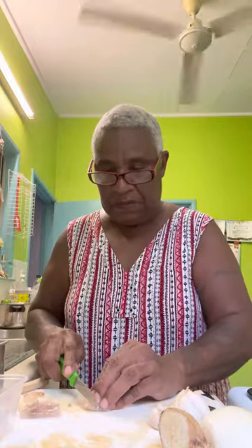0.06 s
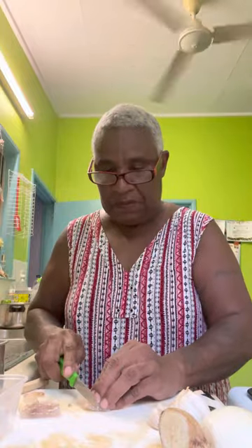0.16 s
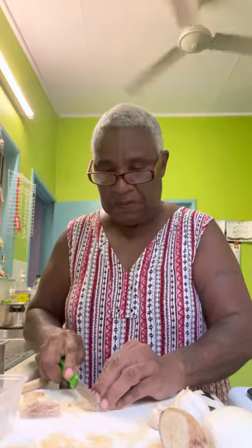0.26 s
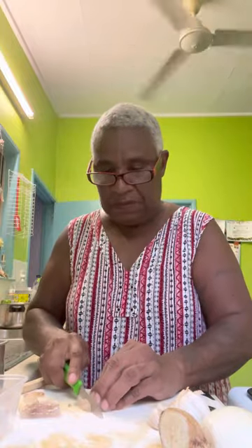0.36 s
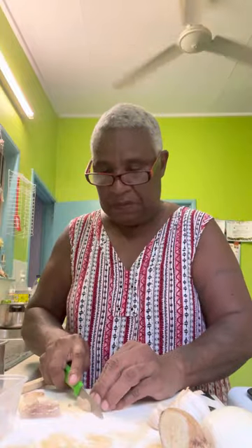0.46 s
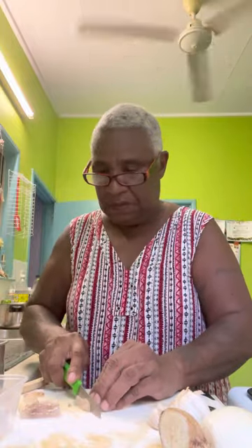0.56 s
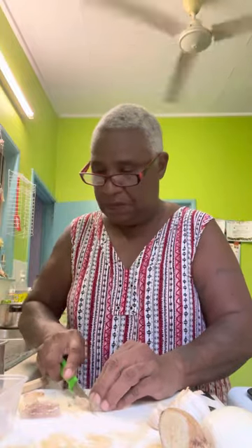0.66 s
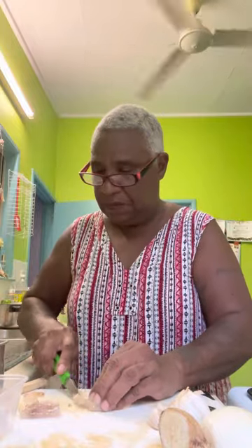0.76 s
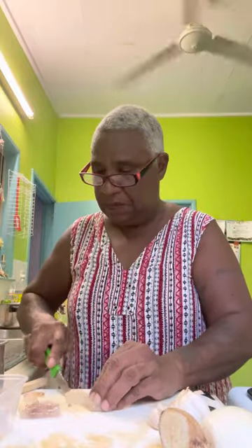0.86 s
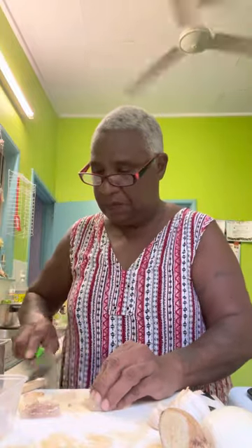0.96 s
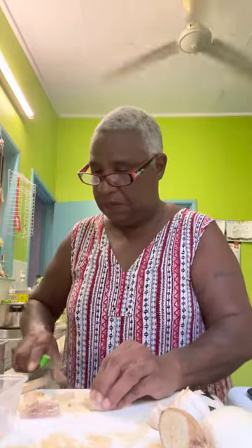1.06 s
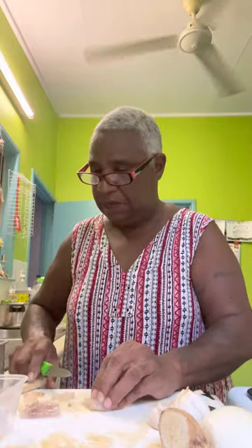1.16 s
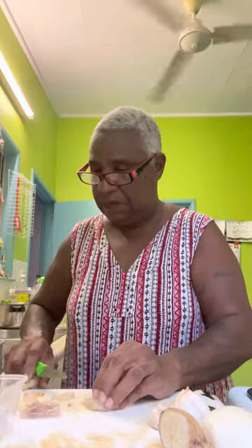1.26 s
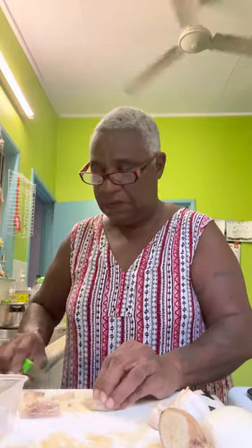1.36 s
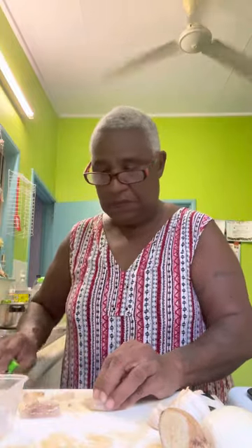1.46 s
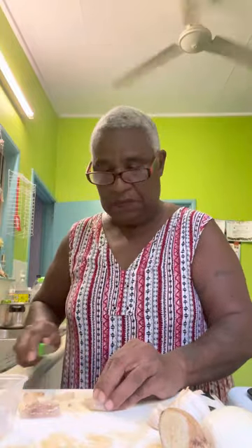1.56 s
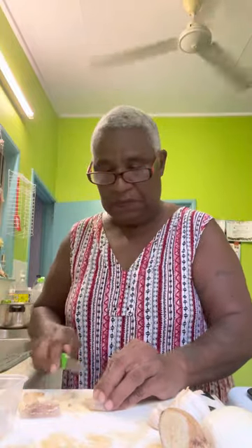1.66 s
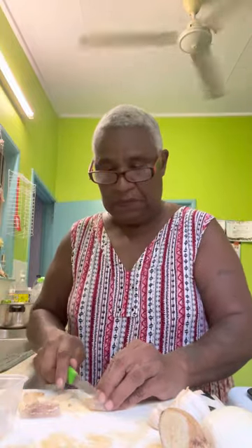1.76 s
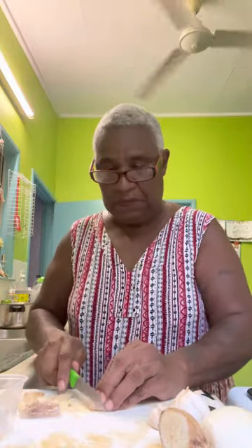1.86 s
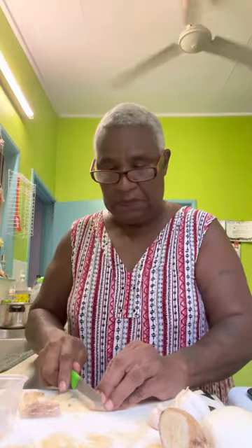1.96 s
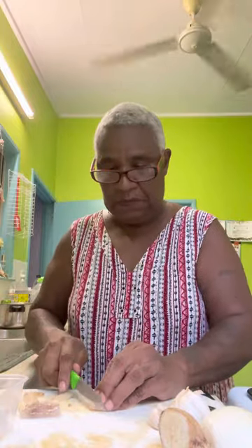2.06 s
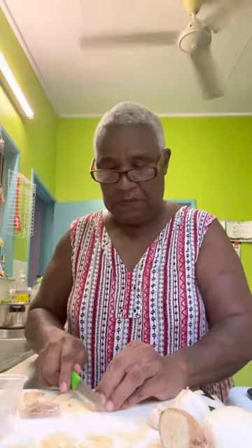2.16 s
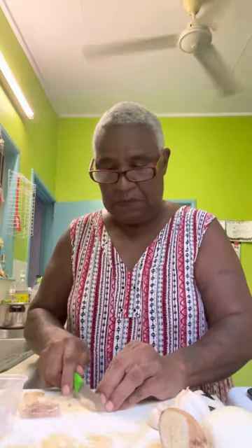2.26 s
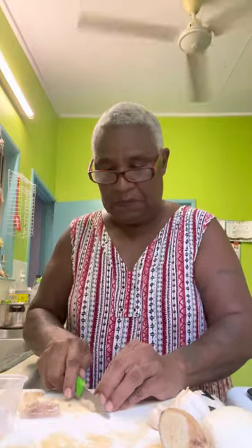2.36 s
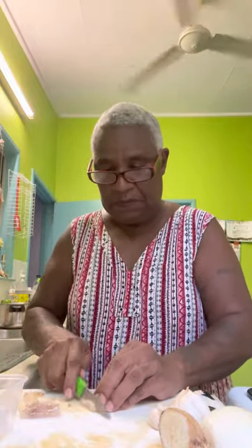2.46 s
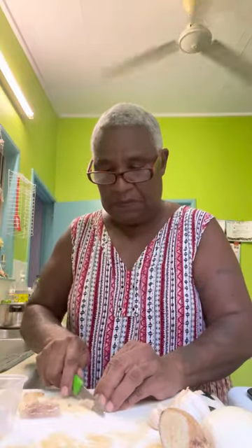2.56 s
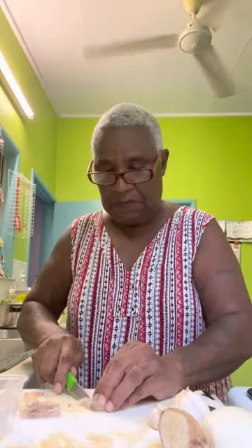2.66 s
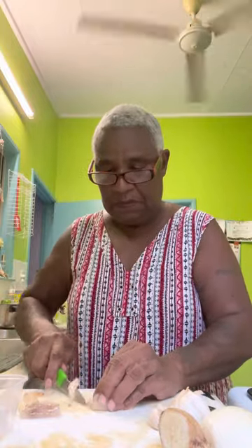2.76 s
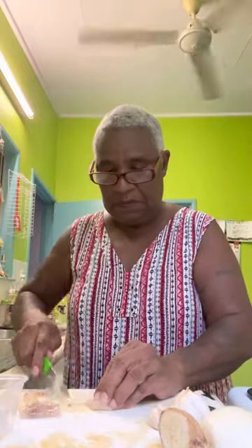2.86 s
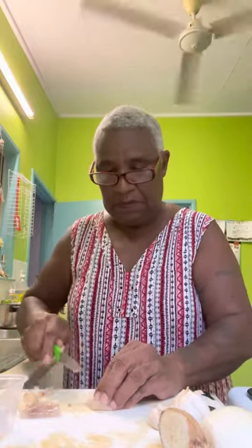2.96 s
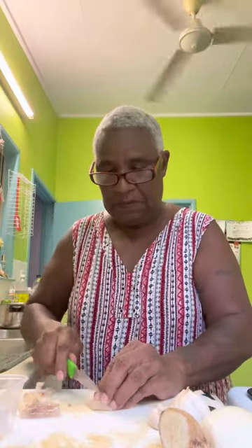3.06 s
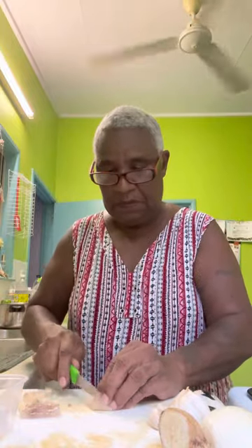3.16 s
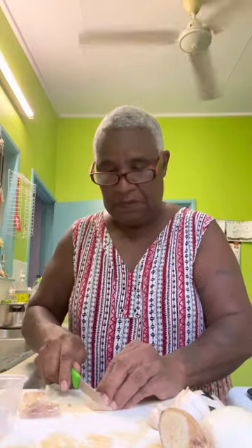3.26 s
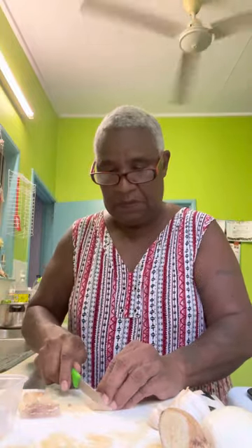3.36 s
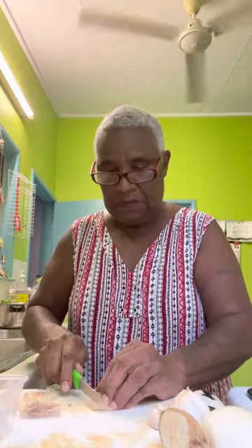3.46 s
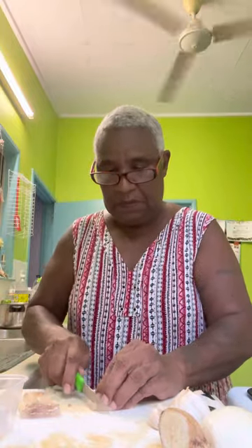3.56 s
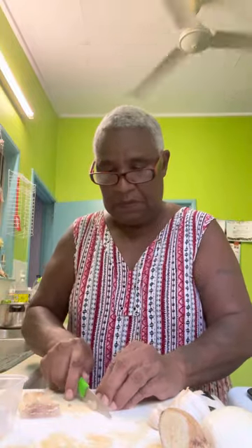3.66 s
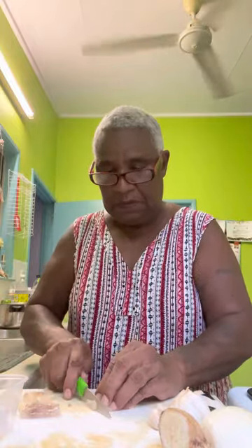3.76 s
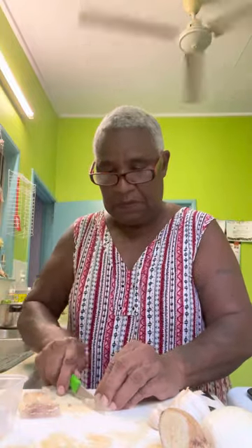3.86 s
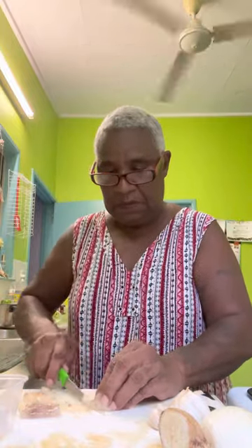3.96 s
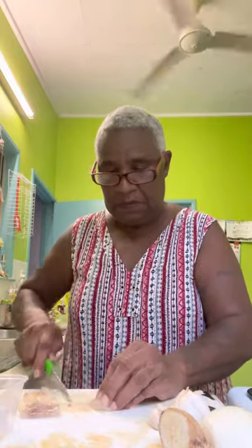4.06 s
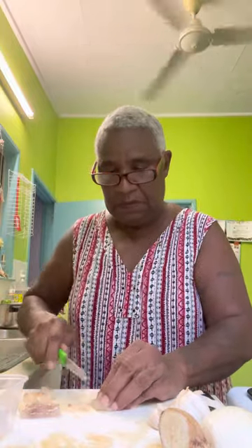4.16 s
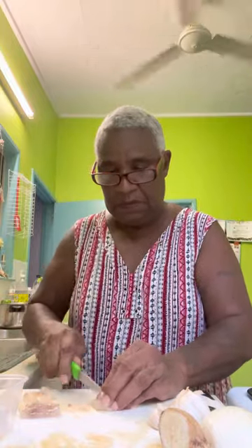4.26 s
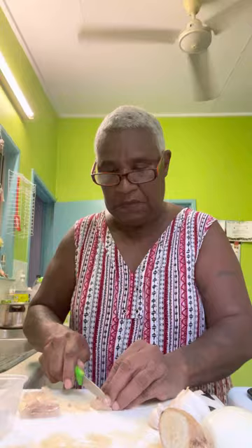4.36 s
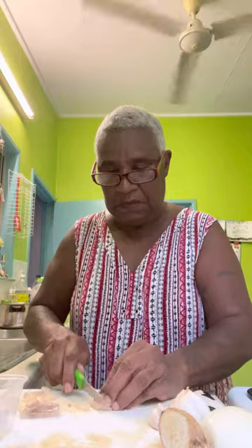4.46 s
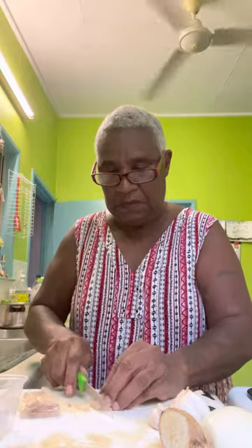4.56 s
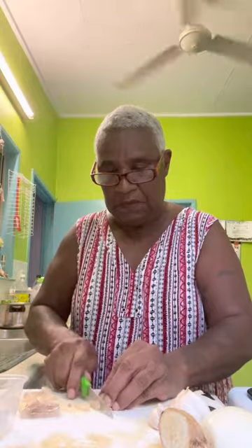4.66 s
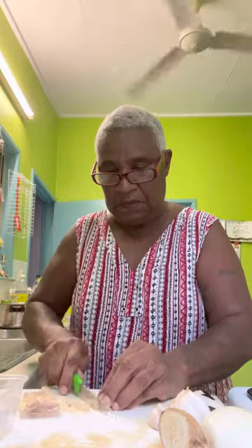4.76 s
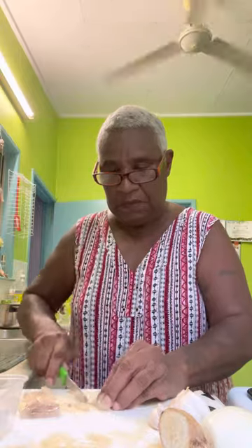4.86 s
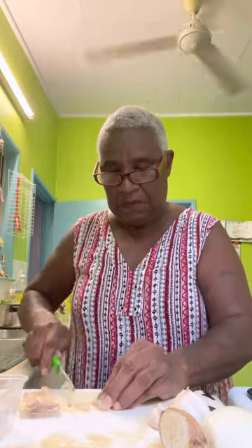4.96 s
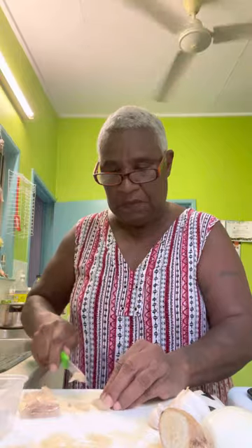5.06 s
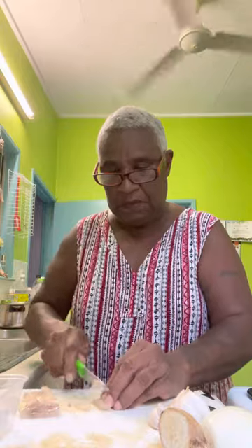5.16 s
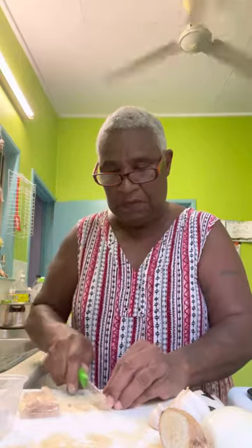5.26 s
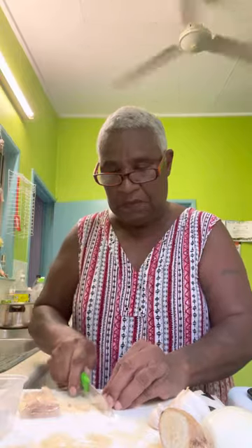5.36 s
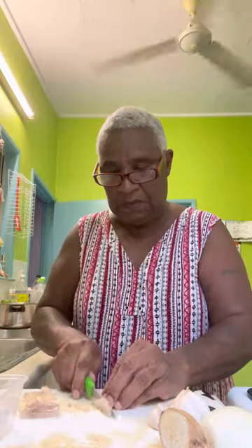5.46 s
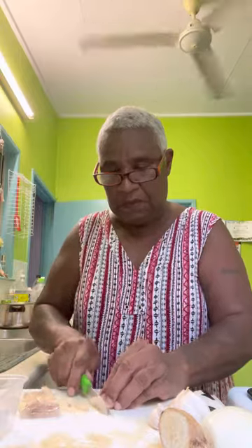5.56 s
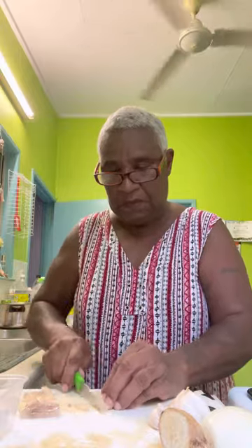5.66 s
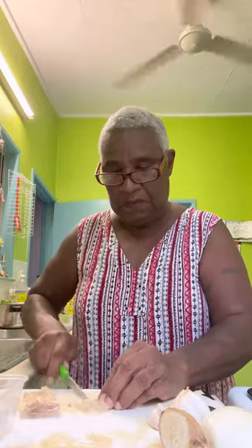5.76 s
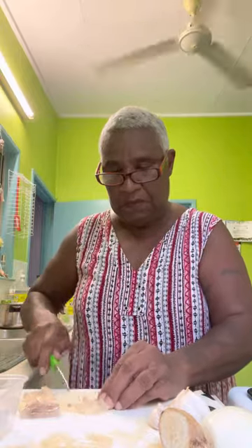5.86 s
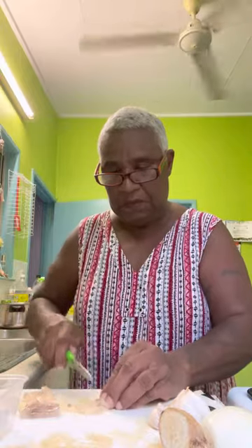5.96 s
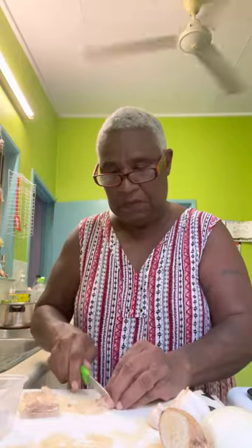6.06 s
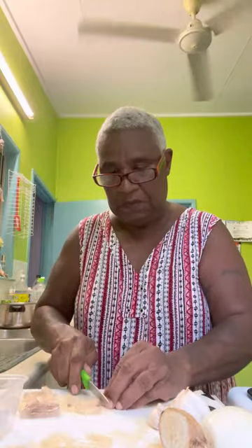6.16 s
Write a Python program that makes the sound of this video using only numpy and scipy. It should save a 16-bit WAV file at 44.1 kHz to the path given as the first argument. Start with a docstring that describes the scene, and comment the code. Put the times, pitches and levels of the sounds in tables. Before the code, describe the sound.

Over soft fan hum in a small kitchen, a blade scrapes through firm food five times; a plastic-like tub judders and knocks after the first.

```python
"""A ceiling fan hums and stirs the air of a small kitchen; then a knife rings faintly and makes five slices.
The blade touches down lightly, rasps through firm food as its fibres tear, and taps the cutting board.
After the first slice a tub is nudged along the counter: it judders and knocks hollowly.
Noise grains make the friction, pulses into resonances the knocks; a phone close by picks it up in stereo."""
import sys
import numpy as np
from scipy import signal
from scipy.fft import rfft, irfft, next_fast_len
from scipy.io import wavfile
from scipy.ndimage import map_coordinates

SR = 44100
rng = np.random.default_rng(int(sys.argv[2]) if len(sys.argv) > 2 else 0)


def transcribe(u):
    """Save the signal u as a 16-bit wav file named by the first command-line argument.

    u: samples, shape (n,) or (channels, n), limited to [-1, 1]; the rate is SR.
    q: integer samples, one column per channel.
    """
    v = np.clip(np.atleast_2d(u).T, -1, 1)
    q = np.round(v * 32767).astype(np.int16)
    wavfile.write(sys.argv[1], SR, q)


N = 274281

# spectrum of blade and board shaken under a stroke: hz, relative_db
RASP_SPECTRUM = [(30, -46), (140, -24.5), (330, -18), (650, -21.5), (900, -29.5), (1150, -20), (1600, -25),
                 (1950, -17.5), (2160, 2), (2330, -3.5), (2550, -31), (2800, -15.5), (3700, -26),
                 (7000, -58)]
# spectrum of the free blade's higher ring, early in a stroke: hz, relative_db
EDGE_SPECTRUM = [(1200, -53), (2100, -15), (2320, -8.5), (2480, -9), (2620, -12.5), (2800, -22),
                 (3500, -36.5), (6000, -58)]
# spectrum of the tearing fibres: hz, relative_db
TEAR_SPECTRUM = [(1500, -47), (2800, -11.5), (3200, -5), (3700, -21.5), (4200, 1.5), (5000, 3), (5450, -6),
                 (5850, -12), (6500, -1), (7300, -2), (8500, -8), (10000, -16), (11500, -26.5),
                 (14000, -61)]

LIFT_S = 0.0074  # time constant of the friction's fade outside a push
LEFT_RIGHT = np.array([[1], [-1]])


def amp(db):
    """Decibels to gain."""
    return 10 ** (np.asarray(db) / 20)


def unit(x):
    """Scale to rms 1."""
    return x / np.sqrt(np.mean(x ** 2) + 1e-20)


def along(points, hz):
    """Read (hz, value) points on a logarithmic frequency axis."""
    point_hz, value = np.transpose(points)
    return np.interp(np.log(hz + 1), np.log(point_hz + 1), value)


def wobble(rate):
    """A smooth random curve with rate knots a second."""
    knots = rng.standard_normal(N // 20)
    return map_coordinates(knots, [np.arange(N) * rate / SR], mode="wrap")


def filtered(x, response):
    """Multiply the spectrum of x by a response of frequency."""
    size = next_fast_len(N + SR // 2)
    hz = np.fft.rfftfreq(size, 1 / SR)
    return irfft(rfft(x, size) * response(hz), size)[..., :N]


def through(x, response):
    """Convolve x with an impulse response of one or two channels."""
    return signal.fftconvolve(np.atleast_2d(x), np.atleast_2d(response), axes=1)[:, :N]


def colour(points, size=4096):
    """The causal impulse response of a spectrum, by way of its cepstrum, scaled to peak 1."""
    gain = amp(along(points, np.fft.rfftfreq(size, 1 / SR)))
    cepstrum = irfft(np.log(gain))
    h = irfft(np.exp(rfft(2 * cepstrum[:size // 2], size)))
    return h / np.abs(h).max()


def ringing(modes):
    """The impulse response of a few damped resonances, scaled to peak 1."""
    t = np.arange(SR // 10) / SR
    h = 0
    for k, (hz, width_hz, db) in enumerate(modes):
        decay = np.exp(-np.pi * width_hz * t)
        # neighbouring modes start with opposite signs
        h = h + (-1) ** k * amp(db) * width_hz * decay * np.sin(2 * np.pi * hz * t)
    h = h * (1 - np.exp(-t / 0.00018))  # the contact takes a moment
    return h / np.abs(h).max()


def blows(times, levels_db, grit=0., life_s=.004, push=0.97):
    """Each contact is a one-sample push and, where grit is set, a brief noisy crunch."""
    out = np.zeros(N + SR)
    t = np.arange(SR // 20) / SR
    envelope = np.exp(-t / life_s) * (1 - np.exp(-t / 0.00021))
    for contact_s, db in zip(times, levels_db):
        crunch = grit * rng.standard_normal(len(t)) * envelope
        out[round(contact_s * SR):][:len(t)] += amp(db) * (push * (t == 0) + crunch)
    return out[:N]


def grains(rate, spread_db):
    """Tiny fractures at random moments, rate a second, with random signs and sizes; rms 1."""
    moments = rng.random(N) < rate / SR
    signs = np.sign(rng.standard_normal(N))
    sizes = amp(spread_db * np.clip(rng.standard_normal(N), -2, 2))
    return unit(moments * signs * sizes)


def bent(x, lag):
    """Bending waves bring the bass after the treble: the delay is lag * (sqrt(1000 / hz) - 1/2), in s."""
    return filtered(x, lambda hz: np.exp(-2j * np.pi * lag * (2 * np.sqrt(1000 * hz) - hz / 2)))


def diffuse(pair):
    """Mix two unrelated signals into a diffuse field whose left-right likeness varies with frequency."""
    # correlation of the two microphones: hz, likeness (1 = identical)
    likeness = [(100, 1), (300, 0.96), (600, 1), (1200, 0.055), (2300, 0.71), (5000, 0.54)]

    def mid_side_gains(hz):
        turn = np.arccos(np.clip(along(likeness, hz), -1, 1)) / 2
        return np.array([np.cos(turn), np.sin(turn)])

    mid, side = filtered(pair, mid_side_gains)
    return np.array([mid + side, mid - side])


def echo(x, decay, count=14):
    """Reflections as decaying noise, different at each microphone, drawn anew for count equal stretches."""
    x = np.atleast_2d(x)
    out = np.zeros((2, N + SR))
    for part in np.array_split(np.arange(N), count):
        hz, t, z = signal.stft(rng.standard_normal((2, SR // 2)), SR, nperseg=256)
        t60 = along(decay, hz)[:, None]
        tail = signal.istft(z * np.exp(-np.log(1000) * t / t60), SR, nperseg=256)[1]
        wet = signal.fftconvolve(x[:, part], tail / np.linalg.norm(tail[0]), axes=1)
        out[:, part[0] + SR // 1000:][:, :wet.shape[1]] += wet  # 1 ms after the direct sound
    return out[:, :N]


def placed(x, near_db, room_db):
    """Direct sound, the counter's quick reflections and the kitchen's tail."""
    # reflections close by: hz, t60_s
    counter_decay = [(200, 0.047), (2000, 0.029), (10000, 0.069)]
    # the room: hz, t60_s
    kitchen_decay = [(150, 0.25), (800, 0.33), (3000, 0.47), (10000, 0.33)]
    near = amp(near_db) * echo(x, counter_decay)
    room = amp(room_db) * echo(x, kitchen_decay)
    return x + diffuse(near + room)


def gesture(start, rise, hold, release, entry_db, sag_db=0., ease_db=0., curve=0.9):
    """The gain of one push of the hand: it swells, sags while held, eases off and stops; times in s."""
    t = np.arange(N) / SR - start
    progress = lambda begin, length: np.clip((t - begin) / length, 0, 1)
    db = -entry_db * (1 - progress(0, rise)) ** curve
    db = db - sag_db * progress(rise, hold)
    db = db - ease_db * progress(rise + hold, release)
    outside_s = np.maximum(np.maximum(-t, t - rise - hold - release), 0)
    return amp(db) * np.exp(-outside_s / LIFT_S)


def air(spectrum, lean_db):
    """Steady stereo noise of rms 1; lean_db raises the left and lowers the right."""
    noise = filtered(rng.standard_normal((2, N)), lambda hz: amp(along(spectrum, hz)))
    return unit(diffuse(noise) * amp(lean_db * LEFT_RIGHT))


def fan():
    """The ceiling fan: sines of wavering level and phase, noise for the stirred air, and a faint hiss."""
    # motor hum, before wavering: hz, rms_db
    motor_hum = [(74.6, -52), (76.2, -84), (100, -59), (175, -66.5), (441, -64)]
    # stirred air: hz, relative_db
    draught_spectrum = [(20, -42), (36, -27), (48, 3), (65, -8.5), (100, -2), (135, -7), (200, -3.5),
                        (400, -3), (600, -7), (1000, -14), (1600, -21), (2600, -28), (5000, -58)]
    # quiet kitchen: hz, relative_db
    hiss_spectrum = [(1000, -12.5), (1800, -11.5), (2230, 3), (2600, -8.5), (3100, -8), (3700, -15.5),
                     (4400, -12), (5200, -13), (6600, -11), (8500, -23.5), (9700, -29), (11000, -70)]
    t = np.arange(N) / SR
    hum = 0
    for hz, db in motor_hum:
        level = np.sqrt(2) * amp(db + 2.2 * wobble(7))
        hum = hum + level * np.sin(2 * np.pi * hz * t + .5 * wobble(3))
    draught = amp(-44.5 + 0.16 * wobble(7)) * air(draught_spectrum, lean_db=-0.95)
    hiss = amp(-54.5) * air(hiss_spectrum, lean_db=0.5)
    return hum + draught + hiss


def tub():
    """The tub judders along the counter, knocks and rebounds; slide and knocks excite its hollow modes."""
    # the hollow body: hz, relative_db, t60_s, left_minus_right_db
    tub_modes = [(145, -15, 0.11, 0.5), (245, -26.5, 0.2, -7), (389, -12, 0.14, -10), (411, -7, 0.12, -10),
                 (476, -23, 0.11, -9), (568, -12.5, 0.15, -4), (741, -9, .52, -1), (812, 0, .21, 0),
                 (871, -11, .2, -2), (1032, -11, .22, 8), (1320, -24, 0.19, 7), (1274, -16, 0.1, 4),
                 (1440, -17, 0.16, -8), (1516, -6.5, 0.058, -3), (1630, -46, 0.054, -6),
                 (2143, -22, 0.31, 20), (2400, -20, 0.11, 12), (2740, -26, .12, 1)]
    # small bump as the slide starts, then knock and rebounds, drive levels:
    # contact_s, ring_db, thump_db, click_db
    tub_knocks = [(1.219, -43, -38, -56), (1.4098, -15, -4.5, -48), (1.4136, -24, -20, -52),
                  (1.4234, -29, -12, -44), (1.4651, -27, -36, -54), (1.4738, -42, -36, -17),
                  (1.4774, -18, -32, -38)]
    # dull part of a knock: hz, relative_db
    thump_spectrum = [(25, -59), (70, -23), (110, -4), (150, 2), (200, -3.5), (290, -11), (390, 0.5),
                      (600, -4.5), (850, 2.5), (1550, -4.5), (1900, -17), (2300, -9), (3000, -26.5),
                      (6000, -36.5), (13000, -49)]
    # sharp part of a knock: hz, relative_db
    click_spectrum = [(300, -79), (1500, -18.5), (3000, 6), (4300, 0), (6000, -10), (8000, -12),
                      (10000, -22), (12000, -28), (15000, -56)]
    # friction on the counter: hz, relative_db
    scuff_spectrum = [(100, -5), (250, -13), (580, 9.5), (830, -15), (1100, -6.5), (1800, -13.5),
                      (2150, -8.5), (2600, -11.5), (3700, -16.5), (5000, -23), (8000, -27), (11000, -34.5),
                      (14000, -74)]
    slide_start_s, slide_rise_s, slide_length_s = 1.216, .09, 0.177
    slide_db, slide_swell_db = -35.5, 6.5

    t = np.arange(SR) / SR
    body = 0
    for hz, db, t60, left_minus_right_db in tub_modes:
        gain = amp(db + left_minus_right_db * LEFT_RIGHT / 2)
        body = body + gain * np.exp(-np.log(1000) * t / t60) * np.sin(2 * np.pi * hz * t)
    body = body * (1 - np.exp(-t / 0.0004))  # a blunt contact starts the ring softly

    s, ring_db, thump_db, click_db = np.transpose(tub_knocks)
    ring = bent(through(blows(s, ring_db), body), lag=0.00203)
    dull_blows = blows(s, thump_db - 1.5, grit=0.17, life_s=0.0091, push=1.5)
    thump = bent(through(dull_blows, colour(thump_spectrum)), lag=0.002954)
    sharp_blows = blows(s, click_db - 4, grit=0.28, life_s=0.0025, push=0.16)
    click = through(sharp_blows, colour(click_spectrum))

    judder = grains(rate=1500, spread_db=4.5)
    scuff = amp(-0.5) * unit(through(judder, colour(scuff_spectrum)))
    hollow_scrape = amp(-2) * unit(through(judder, body))
    push = gesture(slide_start_s, slide_rise_s, slide_length_s - slide_rise_s, LIFT_S, slide_swell_db)
    slide = amp(slide_db) * push * (scuff + hollow_scrape)
    hollow = placed(ring, near_db=-22, room_db=-17)
    return hollow + placed(thump + click + slide, near_db=-2.5, room_db=-1.0)


def ting():
    """The blade gives one thin ring before the first cut: a single decaying sine."""
    # faint touch on the steel: contact_s, pitch_hz, drive_db, t60_s
    steel_touch = (0.313, 4150, -53, .16)
    s, hz, db, t60 = steel_touch
    t = np.arange(SR // 2) / SR
    ring = np.sin(2 * np.pi * hz * t) * np.exp(-np.log(1000) * t / t60)
    return through(blows([s], [db]), ring)


def taps(rows, gap_s, settle_db, count=3):
    """The edge clicks and chatters, gap_s apart; the board gains settle_db on the blade per rebound."""
    # resonances of the blade: hz, width_hz, relative_db
    blade_modes = [(1585, 380, -15.5), (2204, 330, -0.5), (2300, 320, -1.5)]
    # resonances of the board: hz, width_hz, relative_db
    board_modes = [(327, 223, 0.5), (440, 175, 3.5), (760, 113, -4.5), (998, 29, -1.5), (1285, 85, -5.5)]
    # edge against wood: hz, relative_db
    click_spectrum = [(300, -79), (1500, -18.5), (3000, 6), (4300, 0), (6000, -10), (8000, -12),
                      (10000, -22), (12000, -28), (15000, -56)]
    contacts = []
    for s, db, loss_db, thud_db, click_db in rows:
        for k in range(count):
            contacts.append((s + k * gap_s, db - k * loss_db, thud_db + k * settle_db, click_db))
    s, db, thud_db, click_db = np.transpose(contacts)
    blade = through(blows(s, db - 6.5), ringing(blade_modes))
    board = through(blows(s, db + thud_db + 1.0), ringing(board_modes))
    gritty_blows = blows(s, db + click_db + 2.5, grit=0.2, life_s=0.0019, push=0.1)
    click = through(gritty_blows, colour(click_spectrum))
    return bent(blade + board, lag=0.002063) + click


def snaps():
    """Now and then a tough bundle of fibres gives way at once and jolts the blade."""
    # fibres giving way, drive levels: contact_s, jolt_db, crispness_db (relative to the jolt)
    tough_fibres = [(0.5576, -10.5, -9), (0.647, -7.5, -9.5), (0.7449, -11.5, -14), (2.5529, -15.5, -3),
                    (2.611, -4, -13), (3.7537, -13.5, -6.5), (3.9094, -5.5, -14), (4.7289, -9.5, -10),
                    (5.5653, -17.5, 1.5), (5.5932, -6, -20), (5.646, -7, -24), (5.694, -9, -2)]
    s, db, crisp_db = np.transpose(tough_fibres)
    crackle = blows(s, db + crisp_db + 0.5, grit=0.34, life_s=0.0015, push=0.14)
    jolt = blows(s, db - 6.0)
    blade = through(jolt, colour(EDGE_SPECTRUM)) + amp(-12) * through(jolt, colour(RASP_SPECTRUM))
    return blade + through(crackle, colour(TEAR_SPECTRUM))


def strokes():
    """One gesture per slice: free ring and crispness fade sooner than the rasp against the board."""
    # slices: start_s, sinking_s, cutting_s, easing_s, bite (curve exponent, 1 = even swell),
    # pressure_db (on the blade, before unevenness), crispness_db (relative to the pressure)
    slices = [(0.48, 0.14, 0.15, 0.15, 2, -26.5, -12), (2.465, 0.16, 0.072, 0.14, 3.1, -23, -10),
              (3.729, 0.13, 0.054, 0.14, 3.6, -20, -7.5), (4.687, 0.13, 0.062, 0.052, 2.52, -19.5, -9),
              (5.525, 0.089, 0.1, 0.067, 2.7, -20.5, -7.5)]
    entry_db = 34.5  # how far below full pressure a stroke starts
    sag_db, base_ease_db = 2, 17  # pressure lost while cutting and while easing off
    rasp_grows_db = 1.5  # makes up most of the sag, so the rasp barely weakens while cutting
    grip_cut_db, grip_ease_db = 1, 29  # free ring lost on top as the food grips the blade
    dull_cut_db, dull_ease_db = 7.5, 12  # crispness lost on top as the blade goes deeper
    pressure = free_ring = crispness = 0
    for *timing, bite, db, crisp_db in slices:
        def fading(cut_db, ease_db):
            return amp(db) * gesture(*timing, entry_db, sag_db + cut_db, base_ease_db + ease_db, bite)

        pressure = pressure + fading(-rasp_grows_db, 0)
        free_ring = free_ring + fading(grip_cut_db, grip_ease_db)
        crispness = crispness + amp(crisp_db) * fading(dull_cut_db, dull_ease_db)
    return pressure, free_ring, crispness


def slicing():
    """Fibres tear in clumps under the edge: they hiss and shake blade and board, as filtered grains."""
    uneven = amp(0.9 * wobble(60))  # the food resists unevenly
    pressure, free_ring, crispness = np.array(strokes()) * uneven
    clumps = np.tanh(wobble(230))  # the edge sticks and slips
    fibres = grains(rate=2200, spread_db=4.5)
    rasp = unit(through(fibres * amp(0.87 * clumps), colour(RASP_SPECTRUM)))
    edge_grains = grains(rate=2200, spread_db=4.5)
    edge = unit(through(edge_grains * amp(0.43 * clumps), colour(EDGE_SPECTRUM)))
    fine_fibres = fibres + 0.4 * grains(rate=9000, spread_db=2)
    tear = unit(through(fine_fibres * amp(3.4 * clumps), colour(TEAR_SPECTRUM)))
    # the higher ring fades first, so the rasp sinks in pitch as the blade nears the board
    return amp(-6) * pressure * rasp + amp(-5) * free_ring * edge + amp(0.63) * crispness * tear


def scene():
    """Knife and tub on the counter under the fan."""
    # both tap tables, drive levels: contact_s, blade_db, loss_per_rebound_db,
    # thud_db and click_db (relative to the blade)
    light_touches = [(0.4105, -28, 2.5, -9, -6.5), (2.3973, -31, 5.5, -4.5, -5.5),
                     (3.657, -25.5, 4.5, -11, -4.5), (4.634, -35, 3, -5, -7), (5.469, -30, 6, -6, -4.5),
                     (6.1469, -28, 12, -16, -19)]  # the blade touching down lightly
    board_landings = [(0.883, -16.5, 3.5, -15, -22), (2.835, -11.5, 23, -13.5, -19.5),
                      (2.8587, -9.5, 16, -14, -17.5), (4.004, -17, 18, -21.5, -38),
                      (4.015, -15, 33, -16.5, -26), (4.0327, -13, 3, -20.5, -19),
                      (4.9375, -21, 12, -8.5, -25), (4.956, -15.5, 11, -12, -18),
                      (5.7902, -8.5, 5.5, -19, -16.5)]  # the blade coming through onto the board
    # board to phone: hz, left_minus_right_db
    knife_lean = [(100, -1), (350, -2.5), (640, -10), (900, 6.5), (1200, 5.5), (2100, 4), (2600, 1.5),
                  (3800, 2), (6800, 0.5)]
    contacts = taps(light_touches, gap_s=.012, settle_db=1)
    contacts = contacts + taps(board_landings, gap_s=.0065, settle_db=4.5) + ting()
    knife = placed(slicing() + snaps(), near_db=-2.0, room_db=-11.5)
    knife = knife + placed(contacts, near_db=5.5, room_db=-9.5)
    knife = filtered(knife, lambda hz: amp(along(knife_lean, hz) * LEFT_RIGHT / 2))
    return knife + tub() + fan()


def record(dry):
    """The phone's two microphones are slightly out of step, round off loud peaks and lose the top treble."""
    # phase between the microphones: hz, left_lead_rad
    port_phase = [(100, 0.047), (300, 0.12), (520, 0.81), (860, 0.82), (1290, -1.5), (2000, -0.55),
                  (2760, -0.99), (6000, -1.6)]
    # treble loss: hz, gain_db
    microphone_response = [(11500, 0), (13500, -12.5), (16000, -17)]
    ceiling, top_hz = .92, 15800  # peaks are rounded off towards the ceiling; nothing passes above top_hz
    heard = filtered(dry, lambda hz: np.exp(1j * along(port_phase, hz) * LEFT_RIGHT / 2))
    heard = heard / (1 + np.abs(heard / ceiling) ** 10) ** (1 / 10)
    return filtered(heard, lambda hz: amp(along(microphone_response, hz)) * (hz < top_hz))


dry = scene()
out = record(dry)
transcribe(out)
```